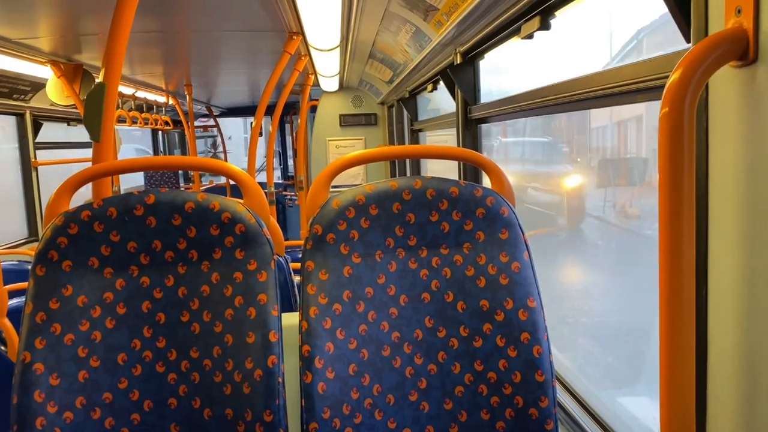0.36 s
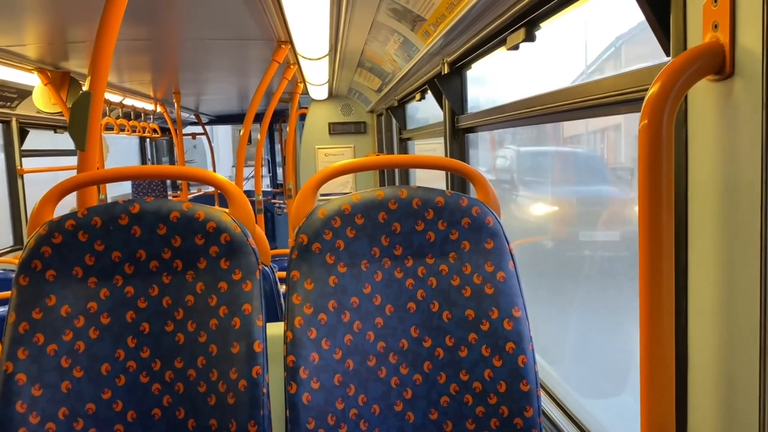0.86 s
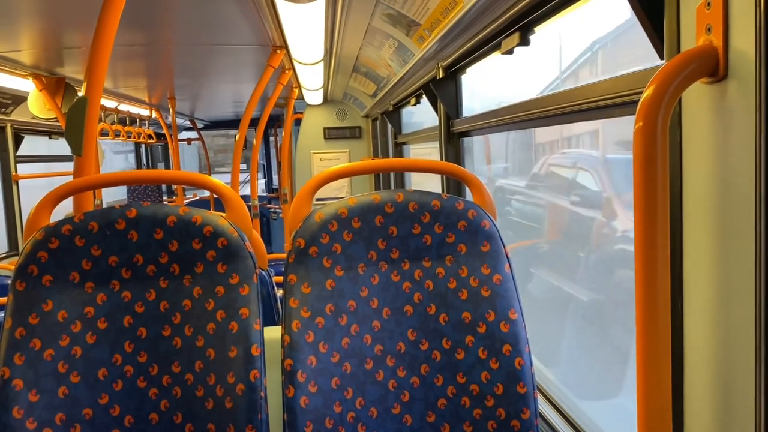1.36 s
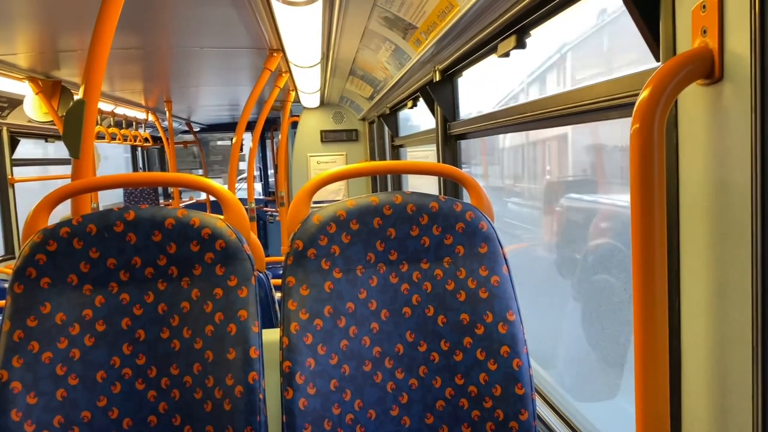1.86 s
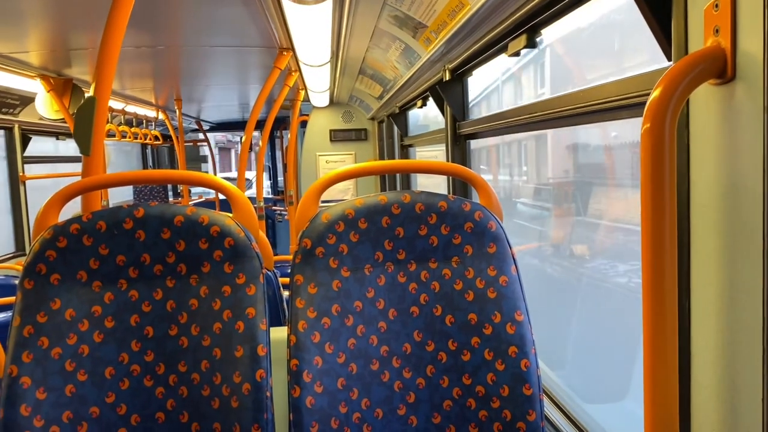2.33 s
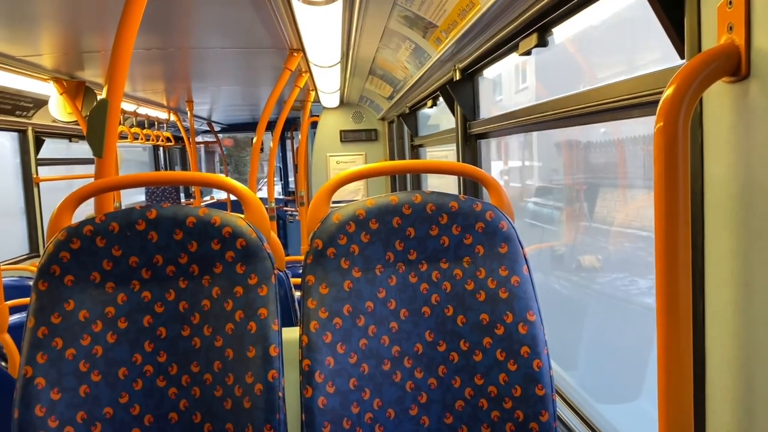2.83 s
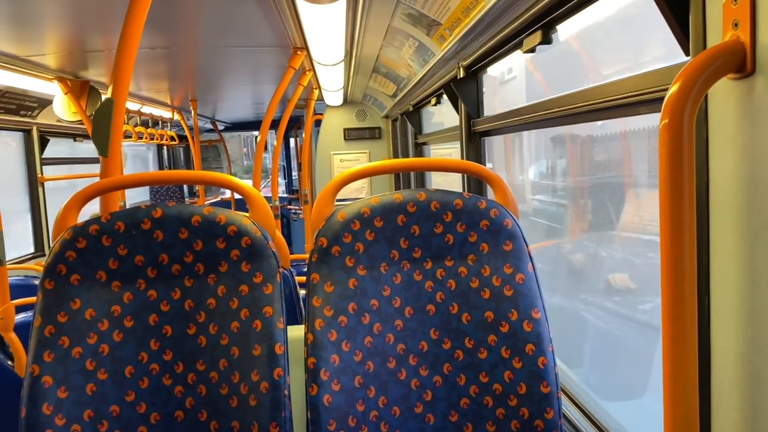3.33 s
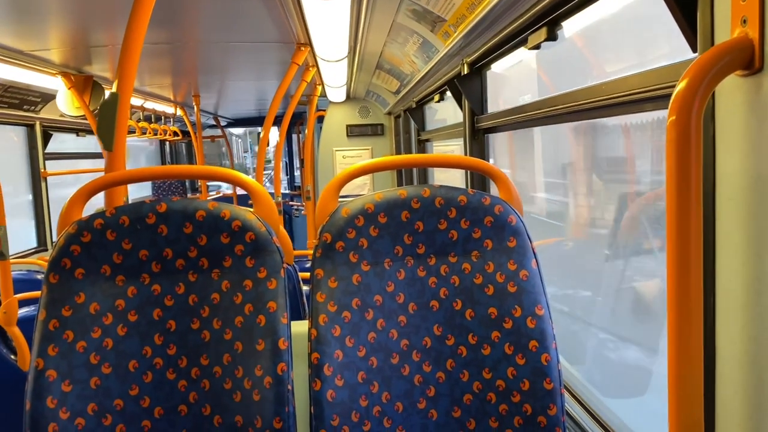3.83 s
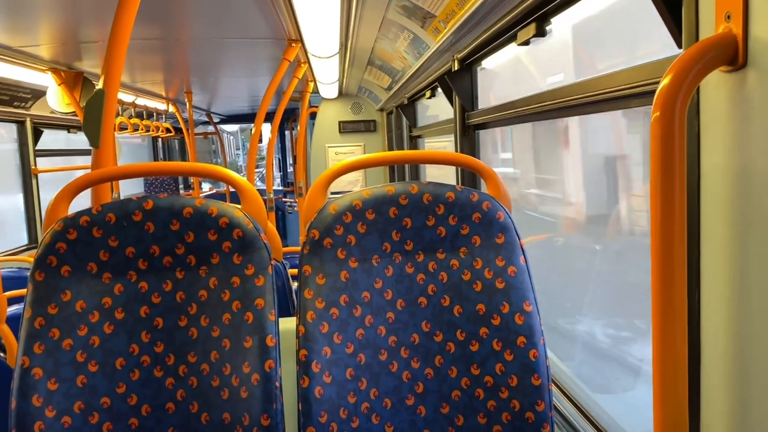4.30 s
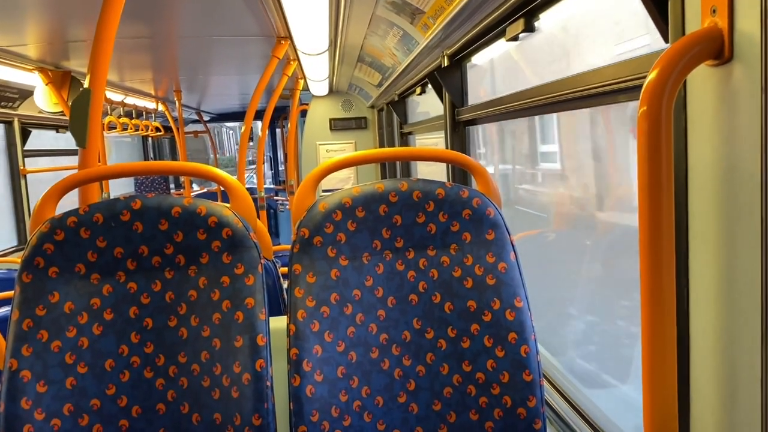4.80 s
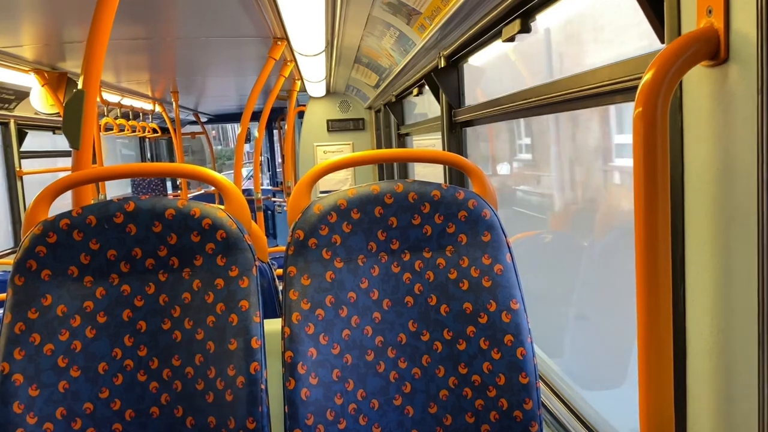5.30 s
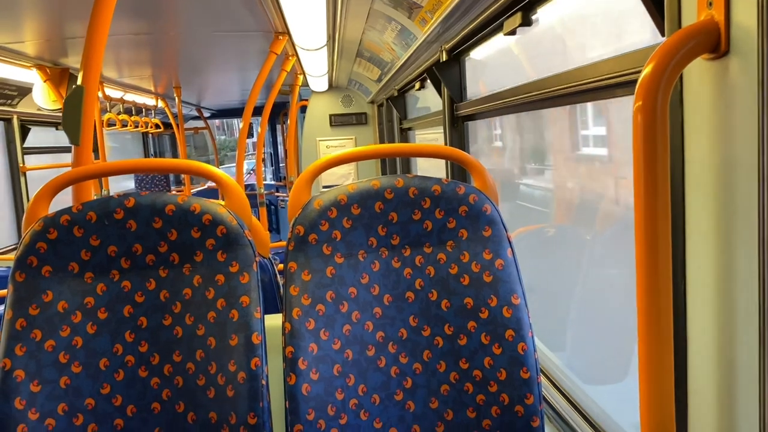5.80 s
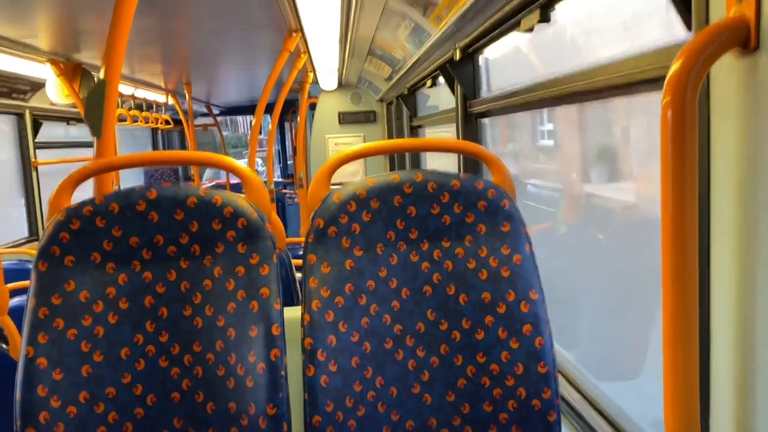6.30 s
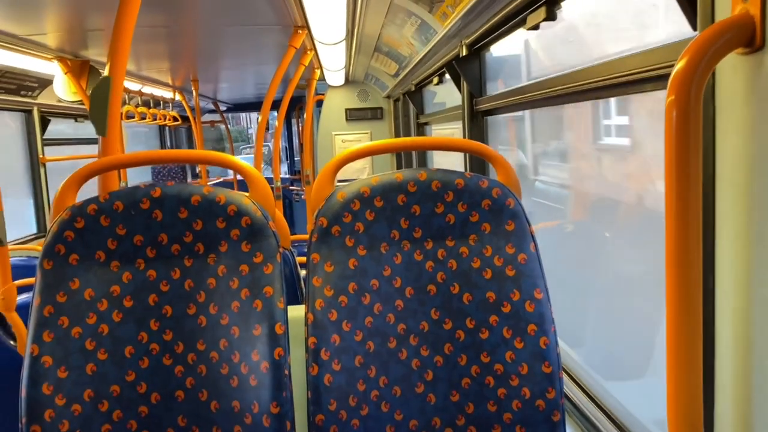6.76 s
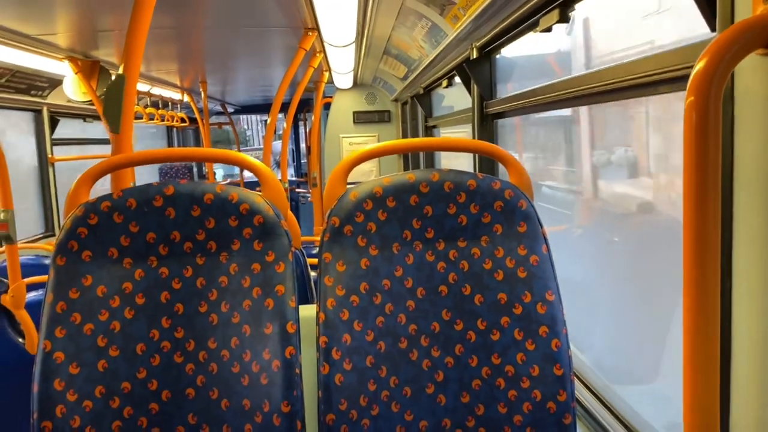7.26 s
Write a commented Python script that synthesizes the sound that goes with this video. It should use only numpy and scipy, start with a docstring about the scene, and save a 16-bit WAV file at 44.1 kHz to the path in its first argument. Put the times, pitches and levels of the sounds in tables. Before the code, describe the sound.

Inside a bus cabin, close and boomy, wide stereo from a seat. For the first 1.1 seconds a six-cylinder diesel idles low, lumpy and fairly quiet, with soft road rumble. From about 1.2 seconds it revs hard: the pitch sweeps up quickly, nearly doubling by 2 seconds, with a strong raspy growl, then climbs more slowly to a peak near 4.5 seconds, roughly three times idle, in a thick booming roar. A thin, frayed turbo whistle and air hiss rise along with it, highest around 4 seconds. From 4.7 seconds the engine is gradually pulled down in pitch, still loud; a very faint high gear whine passes around 5 to 5.8 seconds, and the whistle slides down. Low road drumming swells from 6 seconds. Dull knocks and crisp trim rattles come in short bursts at 6.2, 6.6 and, strongest, 7.2 to 7.3 seconds, while the engine drones steadily to the end.

```python
"""Diesel bus pulling away

Inside a bus, a six-cylinder diesel idles, revs hard as the bus pulls away and is pulled down as the drive locks up.
Sine orders of the firing rate boom through the cabin modes over a roar of shaped noise and road rumble.
The turbocharger whistles as a frayed tone above its own air hiss, and a thin gear whine follows the engine.
Loose trim and frame chatter, as bursts of contacts ringing modes, when the wheels cross a rough patch."""
import sys
import numpy as np
from scipy import signal
from scipy.fft import rfft, irfft, next_fast_len
from scipy.io import wavfile
from scipy.ndimage import uniform_filter1d

SR = 44100
rng = np.random.default_rng(int(sys.argv[2]) if len(sys.argv) > 2 else 0)


def bounce(signal):
    """Save signal as a 16-bit WAV file at the path given by the first command-line argument."""
    frames = np.transpose(np.atleast_2d(signal))
    limited = np.clip(frames, -1, 1)
    pcm = np.round(limited * 32767).astype(np.int16)
    wavfile.write(sys.argv[1], SR, pcm)


def gain_from_db(level_db):
    """Convert decibel levels to linear amplitude factors (20 dB per decade)."""
    decades = np.asarray(level_db, float) / 20
    return 10 ** decades


N = 336924
TIME = np.arange(N) / SR


def evened(x):
    """Scales to rms 1."""
    return x / np.sqrt(np.mean(x ** 2) + 1e-20)


def curves(rows, t):
    """Columns of a time table, read at the times t."""
    s, *columns = np.transpose(rows)
    return [np.interp(t, s, c) for c in columns]


def read(points, hz):
    """A frequency table, read on a log-frequency axis."""
    f, value = np.transpose(points)
    return np.interp(np.log(hz + 1), np.log(f + 1), value)


def modes(table, hz):
    """Gain of a set of resonances at the frequencies hz, their powers summed."""
    power = sum(gain_from_db(db) ** 2 / (1 + (2 * (hz - f) / width) ** 2) for f, width, db in table)
    return np.sqrt(power)


def wander(rate_hz, t):
    """Slow random drift, rms 1: sines from 0.4 Hz to rate_hz, the slower ones stronger."""
    f, start = np.geomspace(.4, rate_hz, num=16), rng.random(16)
    coarse = np.linspace(0, t[-1], num=2000)
    drift = np.sin(2 * np.pi * (f * coarse[:, None] + start)) @ f ** -.5
    return np.interp(t, coarse, evened(drift))


# How alike the noise is at the two ears. Each row: frequency in Hz, likeness (1 = identical).
SAME = [(40, 1), (110, 1), (250, 1), (500, 0.42), (1000, 0.34), (5000, 0.32), (8000, 0.96)]
# Lean of the noise to one side. Each row: frequency in Hz, left minus right in dB.
LEFT_DB = [(60, -5.5), (250, 0.5), (1000, -0.5), (4000, 3), (9000, 2)]


def noise(colour_db, size, patchy_db):
    """Two-ear noise; colour_db(hz, t) gives its relative spectrum and its level over time, both in dB."""
    hop = size // 4
    hz = np.fft.rfftfreq(size, 1 / SR)[:, None]
    t = np.arange(N // hop + 5) * hop / SR
    a, b, c, d, patches = rng.standard_normal((len(t), len(hz), 5)).T
    # smoothed over time and frequency, so that the level is patchy
    patches = uniform_filter1d(uniform_filter1d(patches, 10, axis=0), 10, axis=1)
    patches = evened(patches)
    same = np.clip(read(SAME, hz), -1, 1)
    left = a + 1j * b
    right = same * left + np.sqrt(1 - same ** 2) * (c + 1j * d)
    tilt = gain_from_db(read(LEFT_DB, hz) / 2)
    shape_db, level_db = colour_db(hz, t)
    shape = gain_from_db(shape_db) * np.ones((1, len(t)))
    shape = shape / np.sqrt(2 * (shape ** 2).sum(0))  # the spectrum sets colour only, not loudness
    z = np.array([left * tilt, right / tilt]) * shape * gain_from_db(level_db + patchy_db * patches)
    return signal.istft(z, nperseg=size, noverlap=size - hop)[1][:, :N]


# Roughness of the road, heard as drumming of floor and panels. Each row: time in seconds, level in dB.
ROAD = [(0, -31.5), (.15, -21.5), (.6, -35.5), (1, -30.5), (1.35, -17.5), (1.9, -31.5), (2.9, -35),
        (3.5, -17), (3.8, -33), (4.2, -25.5), (4.5, -15.5), (4.8, -26.5), (5.55, -22), (6.05, -15.5),
        (6.8, -13.5), (7.1, -16), (7.25, -10), (7.5, -20)]
# Colour of the heave of the body on its springs. Each row: frequency in Hz, relative level in dB per Hz.
HEAVE = [(10, -21.5), (25, -16), (45, -8), (65, -8), (90, -25), (300, -93.5)]
# Colour of the drumming. Each row: frequency in Hz, relative level in dB per Hz.
RUMBLE = [(25, -35.5), (60, -0.5), (75, 8.5), (105, -1.5), (135, 1), (175, -17), (300, -46), (900, -101)]
HEAVE_DB = -3  # heave against drumming


def rumble():
    """Lumpy low noise from wheels and body: the road drives both heave and drumming."""
    def heave_colour(hz, t):
        return read(HEAVE, hz), curves(ROAD, t)[0] + HEAVE_DB

    def drumming_colour(hz, t):
        return read(RUMBLE, hz), curves(ROAD, t)[0]
    heave = noise(heave_colour, size=4096, patchy_db=1.5)
    return heave + noise(drumming_colour, size=4096, patchy_db=1.5)


# Turbocharger speed, as the pitch of its whistle. Each row: time in seconds, pitch in Hz.
TURBO = [(0, 1500), (.9, 4200), (1.2, 4450), (1.35, 5200), (1.6, 5950), (2, 7000), (3.02, 9450),
         (3.46, 10680), (3.8, 11020), (4.3, 11140), (4.7, 10930), (5.05, 10400), (5.45, 9420), (5.9, 8050),
         (6.3, 7300), (7.64, 6500)]
# Colour of the air hiss. Each row: frequency in Hz, relative level in dB per Hz.
HISS = [(1500, -55.5), (3200, 1), (4100, -1.5), (4700, 2.5), (5400, -1.5), (7500, -9), (9000, -6),
        (11000, -13), (13000, -17.5), (15500, -19.5), (16300, -61)]
HISS_DB, HISS_DB_PER_KHZ = -64.5, 2.5  # level at zero whistle pitch, and its rise per kHz of pitch


def hiss():
    """Air rushing through intake and turbocharger, louder as the turbocharger speeds up."""
    def colour(hz, t):
        turbo_khz = curves(TURBO, t)[0] / 1000
        return read(HISS, hz), HISS_DB + HISS_DB_PER_KHZ * turbo_khz
    return noise(colour, size=1024, patchy_db=0.9)


# Engine speed and boom. Each row: time in seconds, firing rate in Hz, relative boom at the firing rate in dB.
ENGINE = [(0.0, 34.29, -34.5), (0.6, 34.87, -12.5), (1.12, 35.03, -22.5), (1.2, 37.08, -15),
          (1.35, 44.58, -17), (1.5, 50.12, -15.5), (1.8, 60.24, -7), (2.1, 66.52, -13), (2.4, 71.76, -2),
          (2.55, 75.05, -7), (2.75, 79.7, -1), (3.0, 85.35, 0), (3.4, 90.8, -5.5), (3.9, 95.4, -2.5),
          (4.55, 100.7, -14), (4.8, 98.5, -5.5), (5.1, 97.24, -2.5), (5.5, 90.8, -7), (5.8, 89.1, -6),
          (6.05, 84.7, -5.5), (6.7, 80.27, -8.5), (7.2, 77.97, -8), (7.4, 78.1, -6.5), (7.64, 78.9, -11)]
# Level of the gear whine. Each row: time in seconds, level in dB.
GEAR = [(4.8, -80), (5, -57), (5.5, -58), (5.85, -80)]
GEAR_ORDER = 89.5  # multiple of the firing rate


def gear_whine():
    """A thin sine locked to engine speed, slightly unsteady in pitch and level."""
    hz = GEAR_ORDER * curves(ENGINE, TIME)[0] * (1 + .003 * wander(60, TIME))
    level_db = curves(GEAR, TIME)[0] + 3 * wander(30, TIME)
    return np.sin(2 * np.pi * np.cumsum(hz) / SR) * gain_from_db(level_db)


# How well the whistle carries at each pitch. Each row: pitch in Hz, level in dB.
WHISTLE = [(4250, -79), (4450, -51.5), (5900, -61), (6900, -70), (8000, -64.5), (9450, -50.5),
           (11000, -51.5)]


def turbo_whistle():
    """The turbocharger's tone, unsteady in pitch and level and frayed by the air flow."""
    hz = curves(TURBO, TIME)[0]
    a, b = uniform_filter1d(rng.standard_normal((2, N)), size=200)
    wavering_hz = hz * (1 + .004 * wander(60, TIME))
    spin = np.exp(2j * np.pi * np.cumsum(wavering_hz) / SR)
    # a steady part plus slow complex noise that widens the tone
    frayed = (.6 + .55 * (evened(a) + 1j * evened(b))) * spin
    return frayed.real * gain_from_db(read(WHISTLE, hz) + 2 * wander(32, TIME))


DETUNE = .012  # typical share by which a mode shifts from jolt to jolt


def struck(events, table, contacts_per_s, first):
    """Each jolt makes a dying chatter of small contacts that ring the modes, a little differently every time."""
    out, t = np.zeros((2, N + SR)), np.arange(SR // 8) / SR
    for s, db, length in events:
        contacts = rng.random(len(t)) < contacts_per_s / SR
        chatter = rng.standard_normal(len(t)) * contacts
        chatter[0] = first
        chatter *= (.6 + 4 * t / length) * np.exp(-3.5 * t / length)  # swells briefly, then dies
        chatter /= np.linalg.norm(chatter)
        chance = rng.standard_normal((len(table), 3))
        for ear in range(2):
            # mode levels vary in common, and oppositely at the two ears
            colour_db = 3 * chance[:, 0] + 1.7 * chance[:, 1] * (-1) ** ear
            ring = sum(gain_from_db(level + c - 60 * t / t60) * np.sin(2 * np.pi * hz * (1 + DETUNE * d) * t)
                       for (hz, level, t60), c, d in zip(table, colour_db, chance[:, 2]))
            sound = signal.fftconvolve(chatter, ring)
            out[ear, round(s * SR):][:len(sound)] += gain_from_db(db + (1.3, -1.3)[ear]) * sound
    return out[:, :N]


# Dull knocks in the frame. Each row: start in seconds, relative level in dB, length of the chatter in seconds.
KNOCKS = [(6.182, -9.5, .015), (6.61, -16.5, 0.024), (7.158, -13.5, 0.038), (7.268, -10.5, 0.062)]
# What the frame rings with. Each row: centre frequency in Hz, relative level in dB, 60 dB decay in seconds.
FRAME = [(333, 2, 0.02), (563, -2.5, 0.026), (713, -3.5, 0.011), (850, -6, 0.011), (1150, -13.5, .012),
         (1700, -10, .008)]


def frame_knocks():
    """Jolts of the rough patch ring the low modes of the frame."""
    return struck(KNOCKS, FRAME, contacts_per_s=1500, first=1.3)


# Trim rattles. Each row: start in seconds, relative level in dB, length of the chatter in seconds.
RATTLES = [(6.173, -26.5, 0.018), (6.27, -31, 0.044), (6.551, -20, 0.033), (6.62, -24, 0.081),
           (6.655, -31.5, 0.017), (6.715, -32, 0.04), (7.185, -15.5, 0.067), (7.266, -16.5, 0.059),
           (7.333, -22.5, 0.047)]
# What the trim rings with. Each row: centre frequency in Hz, relative level in dB, 60 dB decay in seconds.
TRIM = [(2200, -9.5, 0.0037), (3720, 0, 0.0018), (4720, -1, 0.0067), (5810, -1.5, 0.0036),
        (6670, -7, 0.0063), (7625, -2.5, 0.0024), (9800, -16, 0.0078), (11000, -17.5, 0.032),
        (12600, -14, .005), (14800, -28, .005)]


def trim_rattles():
    """Loose trim chatters on the rough patch, ringing short bright modes."""
    return struck(RATTLES, TRIM, contacts_per_s=1200, first=2.5)


# Engine load, heard as the level of the roar. Each row: time in seconds, relative level in dB.
LOAD = [(0, -34.5), (.9, -34.5), (1.15, -34), (1.35, -30.5), (2.2, -27.5), (4.1, -26), (4.8, -26), (6, -28),
        (7.64, -28.5)]
# How hard each firing kicks, strongest while pulling away at low speed. Each row: time in seconds, kick in dB.
KICK = [(0, -4.5), (1.15, -2.5), (1.32, 4), (2.1, 7), (2.6, -0.5), (2.9, -4.5), (4.3, 1), (5.5, -2.5),
        (6.3, 1.5), (7.64, -7)]
# Cabin modes that lift an order as it passes. Each row: frequency in Hz, width in Hz, relative gain in dB.
CABIN = [(68, 40, 6), (89.5, 16, 3), (130.5, 19.7, 7), (178, 4.7, -2.5), (227.9, 6.9, 11), (254.2, 5.4, 0),
         (305.6, 12, 0.5), (333.7, 22, 2.5), (442, 26, 0.5), (690, 55.2, -2.5), (750, 24, -12.5),
         (1080, 500, -8.5)]
# Colour of the roar at idle. Each row: frequency in Hz, relative level in dB per Hz.
IDLE = [(90, -29.5), (150, -9.5), (190, -11.5), (250, -20.5), (285, -11), (360, -17), (450, -12.5),
        (520, -21.5), (1200, -20), (1700, -30.5), (2450, -29), (3300, -39), (4500, -40), (8000, -56.5),
        (11000, -60), (15500, -67), (16300, -100)]
# Colour of the roar under load. Each row: frequency in Hz, relative level in dB per Hz.
ROAR = [(90, -5), (150, 0), (230, -7), (275, -7.5), (335, 3.5), (500, -5.5), (1250, -8), (1700, -14.5),
        (2000, -12.5), (2480, -13.5), (2850, -16.5), (3650, -23), (7500, -34.5), (11000, -57), (16300, -87)]
# A ring of the block that hard kicks bring out. Each row: frequency in Hz, width in Hz, weight in dB.
RASP = [(2517, 67, -4.5)]
RASP_DB = 4.5  # lift even under light kicks, before the weight of the ring
RIPPLE_DB = 2.2


def roar():
    """Block and panel noise; its colour shifts from idle to load, and the cabin modes tint its low end."""
    def colour(hz, t):
        load_db = curves(LOAD, t)[0]
        share = np.clip((load_db - load_db.min()) / 8, 0, 1)
        tint_db = 8 * np.log10(0.41 + modes(CABIN, hz))
        rasp_db = RASP_DB + np.maximum(curves(KICK, t)[0], 0)
        tint_db = tint_db + rasp_db * modes(RASP, hz)
        # countless small cabin modes ripple the colour
        tint_db = tint_db + RIPPLE_DB * rng.standard_normal(hz.shape)
        blend_db = (1 - share) * read(IDLE, hz) + share * read(ROAR, hz)
        return blend_db + tint_db, load_db + 9.0
    return noise(colour, size=2048, patchy_db=1.44)


# Modes across the cabin, opposite at the two ears. Each row: frequency in Hz, width in Hz, relative gain in dB.
ACROSS = [(100, 25, -4), (149, 12, -2), (245, 4, 6), (387, 22, 3), (420, 21, -7)]
# Relative strength in dB of firing harmonics 1 to 4 in those modes, one value each.
FIRING_ACROSS_DB = [15.5, 11.5, -8.5, 2.5]
# Relative strength in dB of firing harmonics 2, 3 and 4 against the roar, one value each.
HARMONIC_DB = [8, 1, 4.5]
# Cylinders differ, so weaker orders fill the gaps: their pitches in sixths of the firing rate.
UNEVEN = [4, 5, 8, 9, 10, 14, 15, 16, 20, 21, 22, 26, 28, 30, 32, 36, 40, 44, 48, 54, 60, 66, 72, 78]
# Relative strength in dB of each of those orders.
UNEVEN_DB = [1, -3.5, -1.5, -2, 1, -9.5, -5.5, -3.5, 0.5, 0.5, -6.5, -7.5, -4.5, 0.5, -0.5, -4, -9.5, -1.5,
             -3, -7, -4.5, -10.5, -6, -4.5]
# The orders that stand out at idle, in sixths of the firing rate.
LOPING = [14, 16, 22, 32, 40, 48, 78]
HARMONIC_WAVER_DB = 3


def firing():
    """Harmonics of the firing rate plus the weaker orders of unequal cylinders, in the cabin modes."""
    hz, boom_db = curves(ENGINE, TIME)
    turns = np.cumsum(hz) / SR
    load_db, kick_db = curves(LOAD, TIME)[0], curves(KICK, TIME)[0]
    lope_db = 9 * np.clip((45 - hz) / 10, 0, 1)  # fades as the engine speeds up
    levels = [gain_from_db(boom_db + 1.2 * wander(25, TIME))]
    for k, db in enumerate(HARMONIC_DB, 2):
        level_db = load_db + kick_db + db + HARMONIC_WAVER_DB * wander(8, TIME)
        levels.append(gain_from_db(level_db) * modes(CABIN, k * hz))
    along, across = np.zeros(N), np.zeros(N)
    for k, (level, across_db) in enumerate(zip(levels, FIRING_ACROSS_DB), 1):
        wave = np.sin(2 * np.pi * (k * turns + rng.random()))
        along += level * wave
        push = gain_from_db(load_db - 10.0 + .4 * kick_db + across_db + 0.5 * wander(21, TIME))
        across += push * modes(ACROSS, k * hz) * wave
    for sixths, db in zip(UNEVEN, UNEVEN_DB):
        a, b = rng.random(2)  # starting phases, in turns
        order = sixths / 6
        idle_lift_db = lope_db * (sixths in LOPING)
        push = gain_from_db(load_db - 4 + idle_lift_db + db + 2.5 * wander(10, TIME))
        along += push * modes(CABIN, order * hz) * np.sin(2 * np.pi * (order * turns + a))
        across += gain_from_db(-4.5) * push * modes(ACROSS, order * hz) * np.sin(2 * np.pi * (order * turns + b))
    return np.sqrt(2) * np.array([along * gain_from_db(-6.48) + across, along / gain_from_db(5.5) - across])


def scene():
    """All sources as heard from a seat."""
    background = rumble() + hiss() + gear_whine() + turbo_whistle()
    return background + frame_knocks() + trim_rattles() + roar() + firing()


def top_cut(x):
    """Nothing passes above the cut-off."""
    return signal.sosfilt(signal.butter(12, 17080, fs=SR, output="sos"), x)


# The two microphone ports fall in and out of step. Each row: frequency in Hz, turns by which left leads.
PORTS = [(60, 0.026), (300, -0.124), (1000, -0.132), (1640, -0.28), (2800, 0.025), (7500, 0),
         (8500, -0.413), (9500, -0.54), (10300, -1), (12100, -1), (12700, -1.5), (13800, -1.5), (14500, -2)]


def record(dry):
    """The port spacing turns the phase of the right side; loud peaks are softly rounded."""
    size = next_fast_len(N)
    turn = np.exp(-2j * np.pi * read(PORTS, np.fft.rfftfreq(size, 1 / SR)))
    right = irfft(rfft(dry[1], size) * turn, size)[:N]
    pair = np.array([dry[0], right])
    mix = 1.254 * np.tanh(pair / 1.086)
    return top_cut(mix)


dry = scene()
out = record(dry)
bounce(out)
```